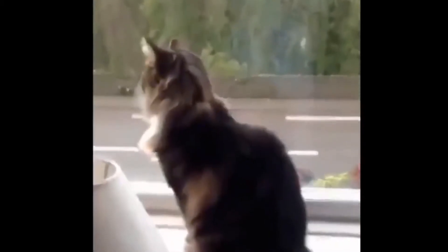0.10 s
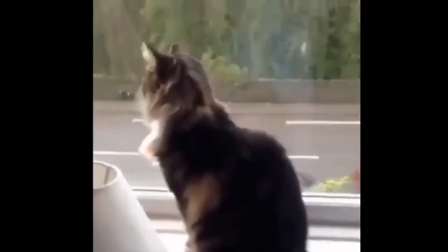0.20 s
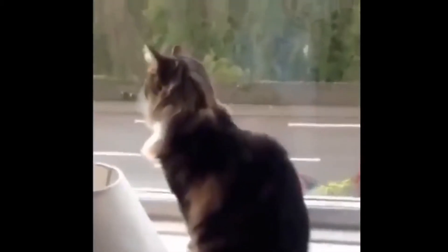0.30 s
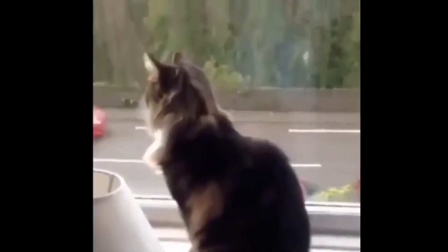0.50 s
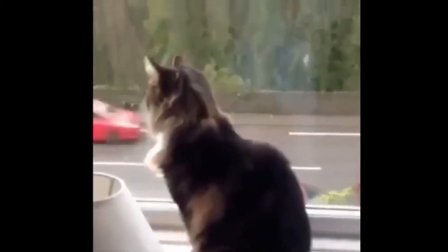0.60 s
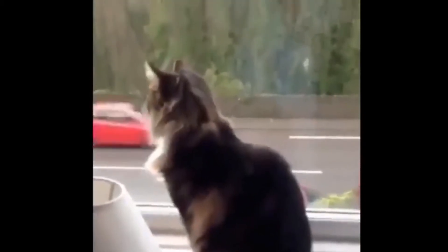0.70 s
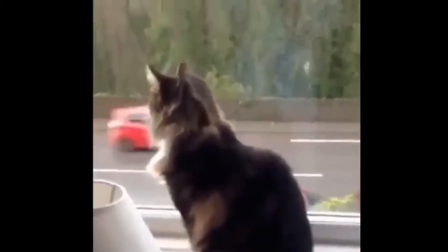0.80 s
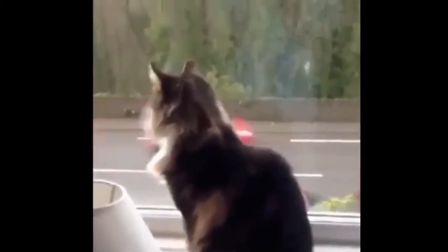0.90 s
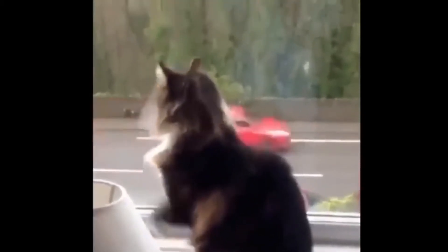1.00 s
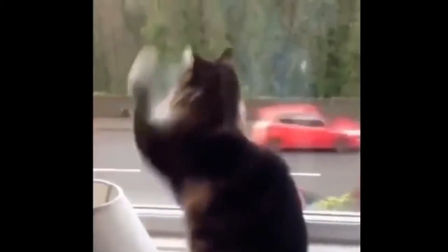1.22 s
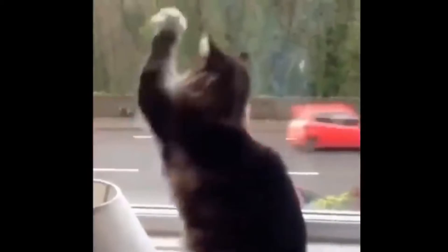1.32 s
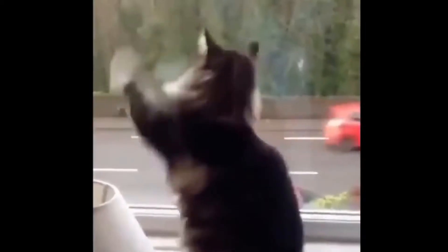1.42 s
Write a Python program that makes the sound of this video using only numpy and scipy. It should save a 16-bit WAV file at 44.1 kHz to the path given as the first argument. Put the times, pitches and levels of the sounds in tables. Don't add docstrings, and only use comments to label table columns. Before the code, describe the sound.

A cat paws at a loose window pane in a quiet room: dull thumps, a burst of claw knocks and scrapes, a low humming shudder of glass, then near silence with faint car drone and microphone hiss.

```python
import sys
import numpy as np
from scipy import signal
from scipy.fft import rfft, irfft
from scipy.io import wavfile
from scipy.ndimage import uniform_filter1d

SR = 44100
rng = np.random.default_rng(int(sys.argv[2]) if len(sys.argv) > 2 else 0)


def volts_from_decibels(level):
    exponent = np.asarray(level, float) / 20
    return 10 ** exponent


def wav_out(sig):
    wavfile.write(sys.argv[1], SR, np.round(np.clip(np.atleast_2d(sig).T, -1, 1) * 32767).astype(np.int16))


N = 63945


def unit(x):
    return x / np.sqrt(np.mean(x ** 2))


def band(x, hz, width_hz):
    return signal.lfilter(*signal.iirpeak(min(hz, 0.45 * SR), hz / width_hz, fs=SR), x)


def walk(rate):
    hold = int(SR / rate)
    levels = np.repeat(rng.standard_normal(N // hold + 1), hold)
    return unit(uniform_filter1d(uniform_filter1d(levels, hold), hold)[:N])


def noise():
    return rng.standard_normal(N)


def wobbling_tone(hz, spread_hz):
    return np.sqrt(2) * np.sin(2 * np.pi * np.cumsum(hz + spread_hz * walk(40)) / SR)


def air():
    # (frequency [Hz], density [dB per Hz])
    air_spectrum = [(18, -54), (30, -10), (185, -10), (256, -6.5), (331, -12), (398, -14.5), (840, -23),
                    (922, -25), (7860, -26.5), (10200, -61.5), (17300, -120)]
    level_db, patchy_db, patch_rate_hz = -67, 3.5, 13.97
    f, db = np.array(air_spectrum).T
    hz = np.maximum(np.fft.rfftfreq(N, 1 / SR), 1)
    colour = rfft(noise()) * volts_from_decibels(np.interp(np.log(hz), np.log(f), db))
    quarter_octave = np.floor(4 * np.log2(hz / 30)).clip(0)
    out = np.zeros(N)
    for k in np.unique(quarter_octave):
        out += irfft(colour * (quarter_octave == k), N) * volts_from_decibels(patchy_db * walk(patch_rate_hz))
    return volts_from_decibels(level_db) * unit(out)


def car(t):
    # (time [s], pitch [Hz], level [dB])
    drone = [
        (0, 232.2, -75.5),
        (0.151, 247.5, -91.5),
        (.9, 261.4, -62),
        (1.101, 198.4, -71.5),
        (1.3, 249.5, -70.5),
        (1.45, 204.4, -61.5),
    ]
    pitch_spread_hz, throb_db = 15, 6
    s, hz, db = np.array(drone).T
    level_db = np.interp(t, s, db) + throb_db * np.tanh(walk(45))
    return wobbling_tone(np.interp(t, s, hz), pitch_spread_hz) * volts_from_decibels(level_db)


def room(x, t):
    t60_s, low_t60_s, low_top_hz, level_db = 0.27, 0.52, 381.38, -8.5
    lows = unit(signal.lfilter(*signal.butter(1, low_top_hz, fs=SR), noise()))
    tail = noise() * volts_from_decibels(-60 * t / t60_s) + 0.19 * lows * volts_from_decibels(-60 * t / low_t60_s)
    tail = tail / np.sqrt(np.sum(tail ** 2))
    return signal.fftconvolve(x, tail)[:N] * volts_from_decibels(level_db)


def side_treble(t):
    faint_db, patchy_db = -102, 5.5
    burst_s, burst_length_s, burst_db = 0.2623, 0.016, -50.5
    faint = volts_from_decibels(faint_db + patchy_db * walk(20))
    burst = volts_from_decibels(burst_db) * np.exp(-((t - burst_s) / burst_length_s) ** 2)
    side = (faint + burst) * unit(band(noise(), 6000, 4000.0))
    return side * np.array([[1], [-1]])


def tap(t):
    # (frequency [Hz], width [Hz], level [dB])
    tip_modes = [(810, 380, -1), (1780, 230, 7.5), (2280, 463, 8), (2900, 350, -13), (3360, 160, 5),
                 (4290, 483, -9)]
    tap_s, level_db, slide_s, slide_db = 1.4385, -54, 0.03, -15
    slide = volts_from_decibels(slide_db) * np.clip(1 + (t - tap_s) / slide_s, 0, 1)
    force = slide + (t > tap_s)
    ring = np.zeros(N)
    for hz, width_hz, db in tip_modes:
        ring += volts_from_decibels(db) * band(band(noise() * force, hz, width_hz), hz, 2 * width_hz)
    return volts_from_decibels(level_db) * ring / np.std(ring[t > tap_s])


def thumps(t):
    # (time [s], level [dB], pitch [Hz], life to -60 dB [cycles])
    pushes = [(0.178, -56, 125, 6), (0.204, -32.5, 113.6, 14), (0.239, -26, 218, 12), (0.266, -21.5, 92, 3),
              (0.302, -18, 125, 6.7), (0.319, -26.5, 232, 15), (0.334, -26.5, 80, 4.9),
              (0.393, -25.5, 125, 5.1), (.455, -18.5, 80, 4.2), (0.489, -40.5, 70, 3.3),
              (0.536, -22.5, 100, 4), (0.542, -32, 379.9, 120), (.555, -23.5, 71.3, 3.3),
              (.594, -23.5, 90, 3), (0.624, -39, 58.7, 2.4), (0.662, -43, 70, 1.3), (0.768, -34, 85, 3.1),
              (0.832, -54, 385, 95), (0.855, -30, 97, 4.8), (0.922, -43, 74, 5.5), (.968, -45.5, 92, 5.7),
              (1.016, -45, 82.3, 3), (1.343, -53, 255, 18), (1.401, -66, 216, 12), (1.444, -45.5, 171, 1.9)]
    rise_cycles = 0.1
    out = np.zeros(N)
    for s, db, hz, life in pushes:
        cycles = np.maximum(t - s, 0) * hz
        rise = 1 - np.exp(-cycles / rise_cycles)
        out += volts_from_decibels(db - 60 * cycles / life) * rise * np.sin(2 * np.pi * cycles)
    return out


def hum(t):
    # (time [s], pitch [Hz], level [dB])
    lowest_mode = [
        (0.172, 184.3, -53),
        (0.237, 194.3, -37),
        (0.321, 169.2, -29.5),
        (0.392, 155.9, -26.5),
        (0.452, 174.1, -30.5),
        (0.511, 165.5, -26),
        (.605, 172.2, -24.5),
        (.67, 169.3, -31.5),
        (.715, 172.6, -44.5),
    ]
    # (time [s], depth [dB], length [s])
    rests = [
        (0.454, -15, 0.005),
        (0.53, -6, 0.0039),
        (0.591, -16.5, .007),
    ]
    ring_t60_s, rough_gain, flutter_db, wander_hz = 1, 0.14, 1.56, 3.5
    rub_db, rub_hz = -7, 115
    s, hz, db = np.array(lowest_mode).T
    onset_db = -2000 * np.maximum(s[0] - t, 0)
    decay_db = -60 * np.maximum(t - s[-1], 0) / ring_t60_s
    level_db = np.interp(t, s, db) + onset_db + decay_db
    for at, dip_db, length_s in rests:
        level_db = level_db + dip_db * np.exp(-((t - at) / length_s) ** 2)
    tone = wobbling_tone(np.interp(t, s, hz), wander_hz) * volts_from_decibels(flutter_db * walk(30))
    rough = unit(band(noise(), np.median(hz), 30.0))
    rub = unit(band(band(noise(), rub_hz, 190.0), rub_hz, 240.0))
    return volts_from_decibels(level_db) * (tone + rough_gain * rough + volts_from_decibels(rub_db) * rub)


def knocks(t):
    # (time [s], level [dB])
    claw_hits = [
        (.3210, -24),
        (.3238, -21),
        (.3270, -19.5),
        (.3305, -30.5),
        (.3345, -24.5),
        (.3395, -29.5),
    ]
    # (frequency [Hz], level [dB], T60 [s])
    middle_modes = [(555, 3, 0.073), (686, -5, 0.073), (830, -3, 0.074), (935, -6, 0.081),
                    (1441, 0.5, 0.066), (1680, -1, .04), (1994, -6, .03), (2336, -4, 0.018),
                    (2560, -4.5, .03), (2769, -5.5, 0.039)]
    mixes = rng.uniform(-1.1, 1, (len(claw_hits), len(middle_modes)))
    out = np.zeros(N)
    for (s, db), mix in zip(claw_hits, mixes):
        age = np.maximum(t - s, 0)
        for (hz, mode_db, t60), m in zip(middle_modes, mix):
            level_db = db + mode_db - 6.5 - 5 * abs(m) - 60 * age / t60
            out += np.sign(m) * volts_from_decibels(level_db) * np.sin(2 * np.pi * hz * (1 + 0.034 * m) * age)
    return out


def ring_modes(x, modes):
    return sum((-1) ** k * volts_from_decibels(db) * band(x, hz, width) for k, (hz, width, db) in enumerate(modes))


def strokes(t):
    # (time [s], pad level [dB], claw level [dB], fur level [dB], T60 [s])
    paw_strokes = [(.02, -71.5, -73.5, -107, 0.69), (0.185, -47.5, -54, -62, 0.38),
                   (0.215, -68, -47, -59, 0.21), (0.241, -35.5, -49, -59.5, 0.24),
                   (0.258, -22, -42, -39, 0.042), (0.264, -47.5, -40, -44, 0.21),
                   (.294, -24, -36, -41.5, 0.24), (0.308, -32, -34, -48.5, .07),
                   (0.3208, -28, -27.5, -54.5, .08), (.334, -25, -53, -54, .12),
                   (0.354, -32, -44, -51, 0.29), (.398, -27.5, -41, -58, 0.16),
                   (0.42, -31, -42, -51.5, 0.23), (0.437, -24, -39, -73, 0.06707),
                   (0.454, -39, -41, -44, 0.12), (0.476, -39.5, -44, -63, .15),
                   (0.541, -25.5, -53, -77, 0.1), (0.556, -30.5, -51.5, -81.5, 0.15),
                   (0.578, -40, -45, -80.5, 0.12), (0.613, -46, -78.5, -85, 0.099),
                   (0.647, -68.5, -79, -86.5, 0.1), (0.768, -82, -79.5, -67.5, 0.12),
                   (0.846, -58, -96, -71, 0.16), (0.927, -76, -97, -63.5, 0.075)]
    # (frequency [Hz], width [Hz], level [dB])
    pane_modes = [(283, 89, -3), (385, 140, -2), (483, 90, -4), (594.5, 72, -3.5), (654, 69, -1.5),
                  (746, 69, -2.5), (846, 58, -4), (884, 110, -7), (1093, 290, -14)]
    # (frequency [Hz], width [Hz], level [dB])
    claw_modes = [(1388, 114, -3), (1743, 123, 1), (1933, 134, -1.5), (2173, 180, -1.5), (2560, 140, -0.5),
                  (2743, 230, -4), (3500, 400, -7)]
    fur_modes = [(4820, 1700, 0)]
    rise_s = np.array([[0.0098], [0.0041], [0.0052]])
    grit_db = 1
    power = np.zeros((3, N))
    for s, pad_db, claw_db, fur_db, t60 in paw_strokes:
        age = np.maximum(t - s, 0)
        shape = (1 - np.exp(-age / rise_s)) * volts_from_decibels(-60 * age / t60)
        power += (volts_from_decibels([[pad_db], [claw_db], [fur_db]]) * shape) ** 2
    impulse = (np.arange(N) == 0) * 1.0
    out = np.zeros(N)
    for force, modes in zip(np.sqrt(power), (pane_modes, claw_modes, fur_modes)):
        scrape = force * noise() * volts_from_decibels(grit_db * walk(600))
        out += ring_modes(scrape, modes) / np.sqrt(np.sum(ring_modes(impulse, modes) ** 2))
    return out


def scene():
    t = np.arange(N) / SR
    scuffs = strokes(t) + knocks(t)
    pushes = thumps(t)
    echo = room(scuffs + 0.5 * pushes, t)
    middle = hum(t) + scuffs + pushes + echo + tap(t) + car(t) + air()
    return middle + side_treble(t)


def low_pass(x):
    return signal.sosfilt(signal.butter(12, 8010, fs=SR, output="sos"), x)


def record(dry):
    ceiling, top_hz = 0.2, 7700
    x = ceiling * np.tanh(dry / ceiling)
    x = signal.sosfilt(signal.ellip(10, 0.3, 60, top_hz, fs=SR, output="sos"), x)
    return low_pass(x)


dry = scene()
out = record(dry)
wav_out(out)
```